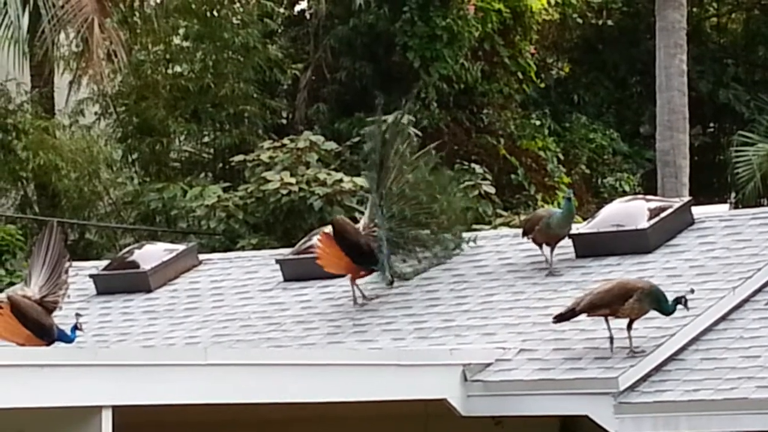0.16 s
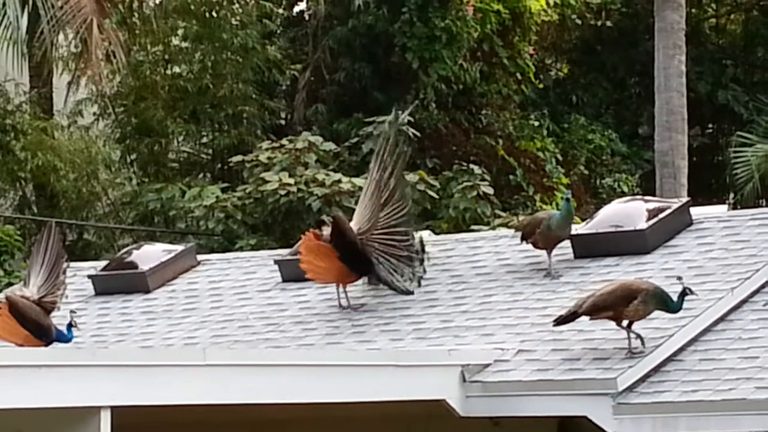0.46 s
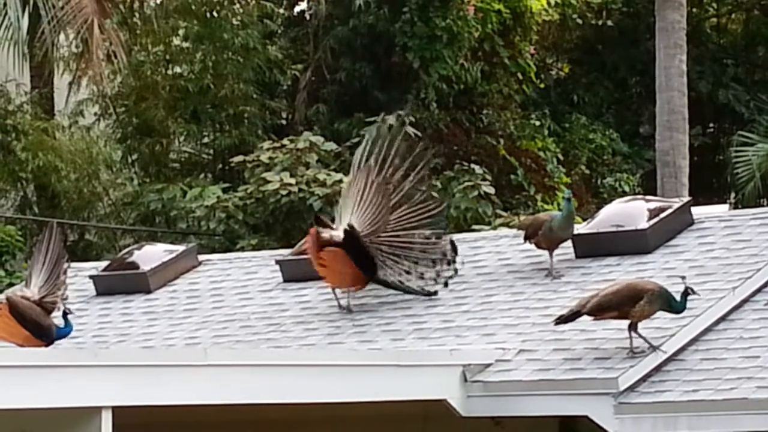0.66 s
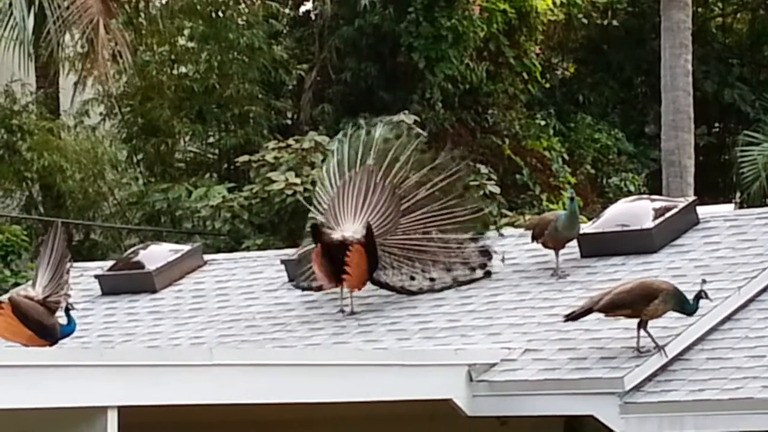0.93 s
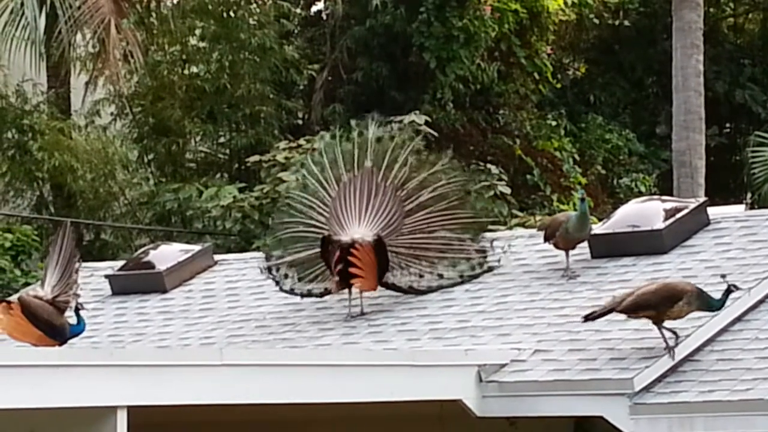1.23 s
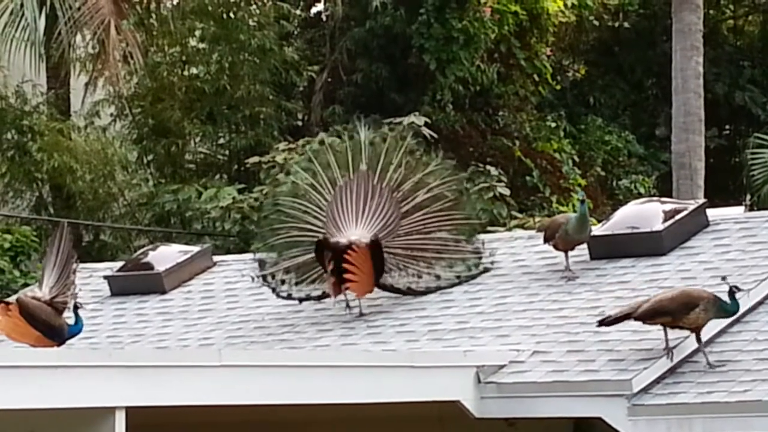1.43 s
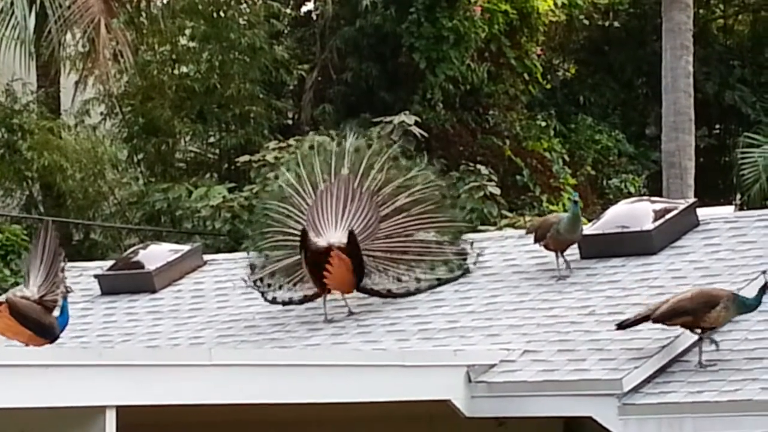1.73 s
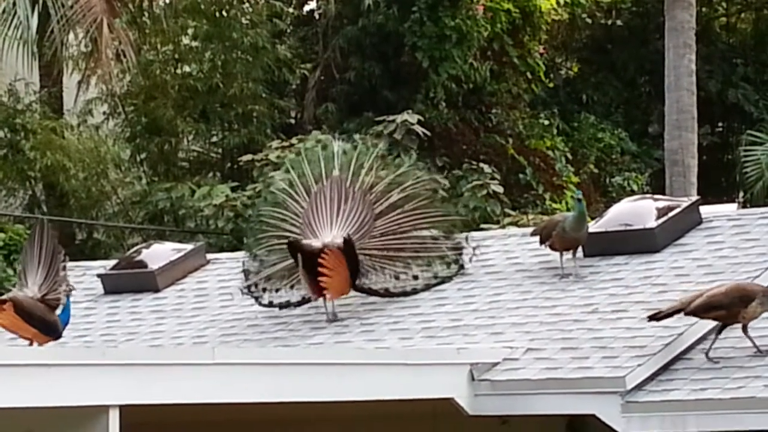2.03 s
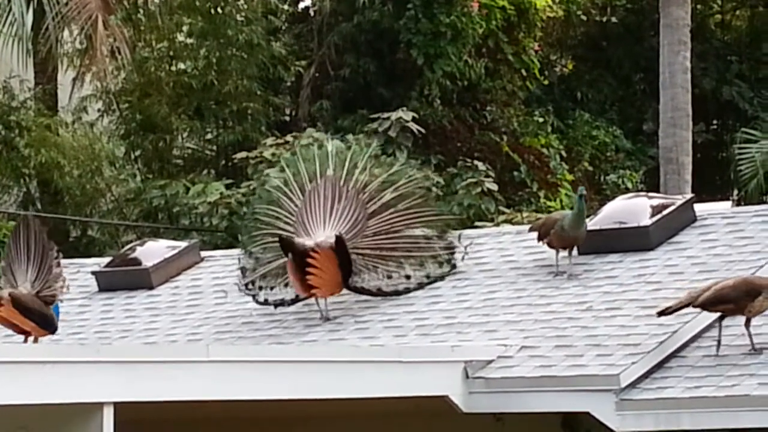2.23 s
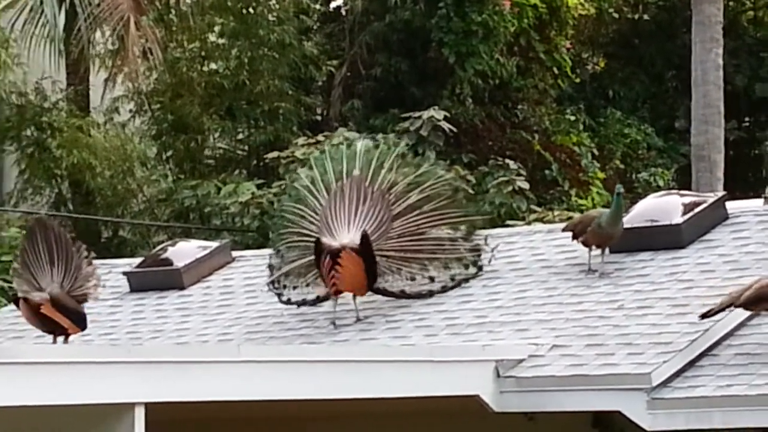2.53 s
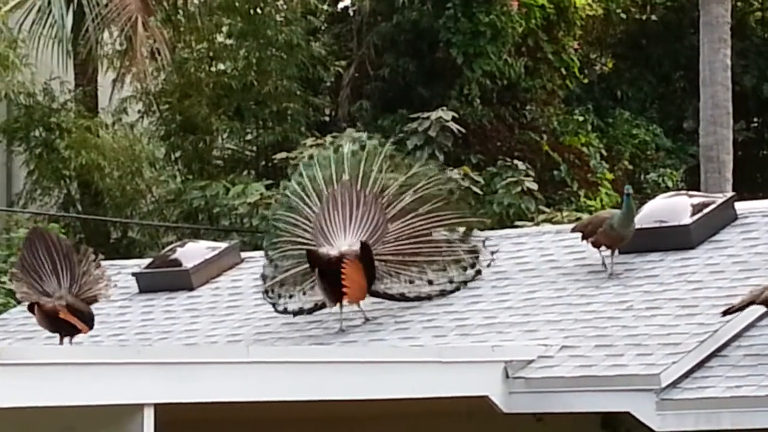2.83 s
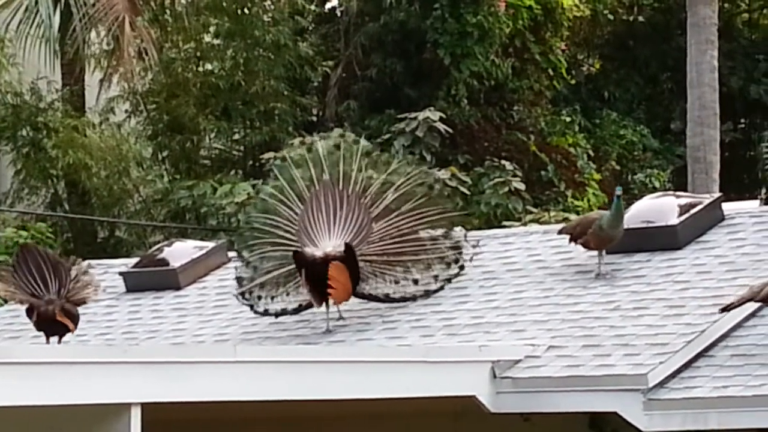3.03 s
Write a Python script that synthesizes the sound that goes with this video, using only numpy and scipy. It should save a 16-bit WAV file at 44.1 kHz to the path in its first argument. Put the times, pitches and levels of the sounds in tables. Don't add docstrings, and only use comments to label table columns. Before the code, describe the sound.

A peacock's fanned tail feathers rattle and rustle in dry, crisp bursts on a roof outdoors.

```python
import sys
import numpy as np
from scipy import signal
from scipy.fft import rfft, irfft, next_fast_len
from scipy.io import wavfile
from scipy.ndimage import uniform_filter1d, map_coordinates

SR = 44100
rng = np.random.default_rng(int(sys.argv[2]) if len(sys.argv) > 2 else 0)


def field_ratio(decibels):
    return 10 ** (np.asarray(decibels, dtype=float) / 20)


def file_out(sig):
    cols = np.atleast_2d(sig).T
    lim = np.clip(cols, -1, 1)
    pcm = np.round(lim * 32767).astype(np.int16)
    wavfile.write(sys.argv[1], SR, pcm)


N = 140238
T = np.arange(N) / SR

# frequency in Hz, level in dB.
RUMBLE = [(15, -38), (25, -2.5), (339, -2.5), (415, -6.5), (507, -8), (746, -12), (781, -12.5), (1000, -18),
          (1300, -24), (2200, -120)]
# frequency in Hz, width in Hz, level in dB.
HUM = [
    (119.2, 16, 1),
    (275, 26, -3),
    (315, 70, -10),
    (481.7, 20, -9),
]
# frequency in Hz, level in dB.
AIR = [(500, -11), (1000, 0), (2500, -7.5), (5000, -4.5), (14000, -11)]
# frequency in Hz, left-right likeness from 0 to 1.
ALIKE = [(40, 0.87), (300, 0.94), (700, 0.71), (1300, 0.017)]
# start in seconds, peak level in dB, left-right balance in dB,
# low body over the crack in dB, decay t60 in seconds.
SINGLE_SNAPS = [(.2815, -32, -12, -32, .012), (.488, -36, -11, -28, 0.011), (.799, -40, -10, -28, .012),
                (.831, -43, -6, -28, .02), (1.0445, -44, -6, -25, .03), (1.21, -41.5, -6, -13, .03),
                (1.4915, -41, -4, -25, .02), (1.684, -37, -8, -28, .02), (2.198, -48, -8, -27, .02),
                (2.473, -43, -5, -25, .02), (2.492, -44, -8, -25, .02), (.2965, -18.5, -16.5, -39, 0.014),
                (.315, -25.5, -23, -36, 0.012), (.3743, -23.5, -21, -25.5, 0.011),
                (.4275, -35.5, -15, -26, 0.018), (.493, -23, -6, -24, 0.013),
                (.5292, -22, -10, -24.5, 0.023), (.563, -45, 0, -17, .016), (.5893, -25.5, -7, -22, 0.017),
                (.737, -27.5, -7.5, -26, 0.027), (.7682, -27, -11, -28, 0.026),
                (.811, -26, -14, -23.5, 0.019), (1.0625, -37.5, 11, -19, 0.038),
                (1.508, -20.5, -9.5, -24.5, 0.047), (1.5603, -24, -4, -24, 0.019),
                (1.566, -27.5, -10, -14.5, 0.023), (1.793, -38, -9, -32, 0.036),
                (1.853, -42, -8.5, -24, 0.066), (1.9095, -30.5, -23, -26, 0.023),
                (2.155, -40.5, -7, -22, 0.056), (2.3305, -33.5, -2.5, -26, 0.041),
                (2.654, -30, -9.5, -21, 0.025), (2.855, -35, -19.5, -20, 0.021),
                (2.8925, -34, -7, -34, 0.03)]
# start in seconds, peak level in dB, left-right balance in dB,
# low body over the crack in dB, decay t60 in seconds.
SNAP_CLUSTERS = [(.175, -34.5, -7, -22, 0.016), (.277, -40.5, -12, -30, 0.038), (.303, -33, -4, -27, 0.011),
                 (.323, -33.5, -12, -38, 0.018), (.369, -30.5, -4.5, -33, 0.015),
                 (.4822, -28.5, -9, -29.5, 0.017), (.66, -37.5, -18, -28, 0.021),
                 (.6692, -29, -13, -25, 0.01), (.7025, -42.5, -3, -6.5, 0.029),
                 (1.226, -38, -12, -22, 0.033), (1.2305, -32, -14, -34, 0.032),
                 (1.237, -29, -4, -26, 0.025), (1.509, -31, -7, -23, 0.024), (1.5428, -28, 3, -21, 0.025),
                 (1.659, -38, -8, -28, .03), (1.336, -37, -13, -30, 0.032), (1.709, -34.5, -8, -17, 0.019),
                 (2.003, -33, -12.5, -20.5, 0.034), (2.2115, -31.5, -2, -23, 0.014),
                 (2.348, -50, -10, -20, 0.017), (2.786, -39.5, -13, -6.5, 0.034)]
# frequency in Hz, level in dB.
CRACK_TONE = [(800, -44), (2000, -20.5), (3600, -13), (5000, -1.5), (7500, -3), (10000, -7.5), (15000, -12)]
# frequency in Hz, level in dB.
KNOCK_TONE = [(150, -38), (500, 2.5), (1100, -1.5), (2200, -3), (3500, -11), (6000, -45)]
# crest in seconds, level in dB, rise in seconds, fall in seconds.
SHIVERS = [(.19, -52, 0.011, 0.11), (.29, -47, 0.0075, 0.049), (.33, -48.5, 0.019, 0.056),
           (0.432, -50.5, 0.013, 0.081), (.5, -51, 0.03, 0.046), (.57, -46, 0.012, 0.04),
           (0.669, -48, 0.026, 0.019), (0.706, -46, 0.004, 0.023), (0.791, -41, 0.016, 0.053),
           (0.919, -55, 0.0039, 0.073), (1.069, -50, 0.015, 0.082), (1.245, -39, 0.022, 0.014),
           (1.334, -51.5, 0.055, 0.089), (1.494, -56.5, 0.027, 0.06), (1.52, -49, 0.016, 0.033),
           (1.59, -54, 0.013, 0.05), (1.69, -47, 0.046, 0.032), (1.8, -51, 0.0065, 0.02),
           (1.901, -50, 0.021, 0.091), (2.013, -56, 0.014, 0.041), (2.202, -48, 0.019, 0.027),
           (2.339, -48.5, 0.014, 0.039), (2.503, -40.5, 0.019, 0.021), (2.721, -48, 0.069, 0.055),
           (2.801, -47, 0.023, 0.067), (2.902, -48, 0.038, 0.049), (3.029, -52, 0.023, 0.15)]
# frequency in Hz, level in dB.
BARB_TONE = [(1000, -21.5), (2500, -15), (3800, -6.5), (5000, -4), (7500, -3.5), (9500, -2.5), (12500, -7),
             (15000, -9)]
# frequency in Hz, t60 in seconds.
YARD_DECAY = [(300, 0.15), (2000, 0.3), (6000, 0.34), (14000, 0.24)]
# start in seconds, level in dB, pitch in Hz, left-right balance in dB.
STEPS = [(.738, -33.5, 544, 2), (1.176, -38.5, 203, 2), (.468, -36.5, 450, 3), (1.496, -36, 250, 4),
         (1.532, -39, 320, 0), (1.58, -40, 250, 4), (1.764, -42, 240, 2), (2.207, -39, 131, 4),
         (2.427, -39.5, 260, 6), (2.444, -46, 300, 6), (2.458, -40, 260, 6), (2.468, -46, 300, 8),
         (2.771, -39, 250, 2), (2.784, -33, 430, 1), (2.793, -36, 270, -2), (2.799, -38, 400, 2),
         (2.813, -41, 270, 2)]
# frequency in Hz, level in dB, t60 in seconds.
PLANK = [
    (1010, -42, .055),
    (816, -55, 0.044),
    (640, -53, .06),
    (1600, -60, .05),
]
# centre in seconds, level in dB, half length in seconds, left-right balance in dB.
PUFFS = [
    (2.45, -51, .025, 6),
    (2.792, -50, .016, 0),
]
# frequency in Hz, level in dB.
PUFF_TONE = [(60, -26), (200, 3.5), (450, -4.5), (900, -12), (2000, -43)]
# resonance in Hz, width in Hz, level in dB.
LEFT_PORT = [(1850, 2530, 5.5), (4920, 1220, 11.5), (8800, 740, -18)]
# resonance in Hz, width in Hz, level in dB.
RIGHT_PORT = [(3080, 2960, -1), (7020, 1880, 14), (11840, 3150, -1)]

KNOCK_GRAIN_DB = 2
HISS_CORNER_HZ = 8000


def unit(x):
    return x / np.sqrt(np.mean(x ** 2) + 1e-20)


def along(points, hz):
    f, v = np.transpose(points)
    return np.interp(np.log(hz + 1), np.log(f + 1), v)


def wobble(rate):
    knots = rng.standard_normal(int(N * rate / SR) + 4)
    return map_coordinates(knots, [T * rate])


def filtered(x, response):
    m = next_fast_len(N + SR // 2)
    return irfft(rfft(x, m) * response(np.fft.rfftfreq(m, 1 / SR)), m)[..., :N]


def peak(f, hz, width):
    return 1j * f * width / (hz * hz - f * f + 1j * f * width)


def rush(gain):
    def turn(f):
        return np.arccos(along(ALIKE, f)) / 2

    noise = rng.standard_normal((2, N))
    mid, side = filtered(noise, lambda f: gain(f) * [np.cos(turn(f)), np.sin(turn(f))])
    return unit(np.array([mid + side, mid - side]))


def town():
    def rumble_gain(f):
        low_cut = f ** 4 / (f ** 4 + 42 ** 4)
        return field_ratio(along(RUMBLE, f)) * low_cut

    def hum_gain(f):
        return sum(field_ratio(db) * abs(peak(f, hz, width)) ** 2 for hz, width, db in HUM)

    def air_gain(f):
        return field_ratio(along([(200, -40)] + AIR, f))

    rumble = field_ratio(-59.5 + 0.26 * wobble(4.15) + 0.86 * wobble(14)) * rush(rumble_gain)
    hum = field_ratio(-60.5 + 0.91 * wobble(9)) * rush(hum_gain)
    air = field_ratio(-63.5 + 0.53 * wobble(3.8)) * rush(air_gain)
    return rumble + hum, air


def gate(loud):
    window_s, slope, middle_db, range_db = 0.027, 0.44, -54.5, 3.5
    power = uniform_filter1d((loud ** 2).mean(0), round(window_s * SR))
    level_db = 10 * np.log10(np.abs(power) + 1e-9)
    return field_ratio(range_db * np.tanh(slope * (level_db - middle_db) / range_db))


def lagged(pair, spectrum):
    lag_s = 0.000592
    return filtered(pair, lambda f: field_ratio(along(spectrum, f)) * np.array(
        [np.exp(-2j * np.pi * f * lag_s), np.ones(len(f))]))


def clicks(spread_db, spectrum, rate):
    shared, patch_db = 0.14, 3
    raw = rng.standard_normal((3, N)) * field_ratio(spread_db * wobble(rate))
    pair = np.sqrt(shared) * raw[0] + np.sqrt(1 - shared) * raw[1:]
    z = signal.stft(pair, nperseg=128)[2]
    patches = uniform_filter1d(rng.standard_normal(z.shape[1:]), size=6, axis=0)
    patches = uniform_filter1d(patches, size=5, axis=1)
    patchy = signal.istft(z * field_ratio(patch_db * unit(patches)), nperseg=128)[1][:, :N]
    return unit(lagged(patchy, spectrum))


def snaps():
    crack, knock, release = np.zeros((2, N + SR)), np.zeros(N + SR), np.zeros((2, N))
    t = T[:SR // 8]
    kinds = ((SINGLE_SNAPS, .0002, .95, True), (SNAP_CLUSTERS, .0012, 2.2, False))
    for rows, attack, hold, single in kinds:
        for s, db, pan_db, body_db, t60 in rows:
            at = round(s * SR)
            side = field_ratio(np.array([.5, -.5]) * np.clip(pan_db + 10, -11, 11))
            fade = field_ratio(db - 60 * (t / t60) ** hold) * (1 - np.exp(-t / attack))
            crack[:, at:at + len(t)] += side[:, None] * fade
            knock_fade = field_ratio(db + body_db + 10.5 - 60 * t / (3.07 * t60))
            knock[at:at + len(t)] += knock_fade * (1 - np.exp(-t / .002))
            if single:
                release[:, at + round(.0003 * SR)] += side * field_ratio(db + 19)
    cracks = crack[:, :N] * clicks(1.5, CRACK_TONE, 900) + lagged(release, CRACK_TONE)
    knocks = knock[:N] * clicks(KNOCK_GRAIN_DB, KNOCK_TONE, 400)
    return field_ratio(-12) * (cracks + knocks)


def shivers():
    swell = np.zeros(N)
    for s, db, rise, fall in SHIVERS:
        before, after = np.exp(-((T - s) / rise) ** 2), np.exp(-np.abs(T - s) / fall)
        swell += field_ratio(db) * np.where(T < s, before, after)
    rustle = clicks(2.5, BARB_TONE, 750) * field_ratio(1.4 * wobble(90))
    rustle = rustle + field_ratio(-10.5) * clicks(KNOCK_GRAIN_DB, KNOCK_TONE, 300)
    return field_ratio(-7) * swell * rustle


def yard(x):
    gap_s = .004
    out = np.zeros((2, N))
    first = np.sin(2 * np.pi * 2.3 * T) > 0
    for turn in (first, ~first):
        hz, t, z = signal.stft(rng.standard_normal((2, SR // 2)), SR, nperseg=256)
        decay = field_ratio(-60 * t / along(YARD_DECAY, hz)[:, None])
        tail = signal.istft(z * decay, SR, nperseg=256)[1]
        late = np.pad(x.mean(0) * turn, (round(gap_s * SR), 0))
        out += signal.fftconvolve(late[None], tail / np.linalg.norm(tail[0]), axes=1)[:, :N]
    return field_ratio(-6.5) * out


def steps():
    out = np.zeros((2, N))
    for s, db, hz, pan_db in STEPS:
        t = np.maximum(T - s, 0)
        level = field_ratio(db + np.array([[.5], [-.5]]) * pan_db)
        out += level * np.sin(2 * np.pi * hz * t) * np.exp(-t * hz * 3.7)
    t = np.maximum(T - 2.781, 0)
    for hz, db, t60 in PLANK:
        out += field_ratio(db - 60 * t / t60) * np.sin(2 * np.pi * hz * t) * (1 - np.exp(-t / 0.0035))
    return out


def puffs():
    swell = np.zeros((2, N))
    for s, db, half, pan_db in PUFFS:
        level = field_ratio(db + np.array([[.5], [-.5]]) * pan_db)
        swell += level * np.exp(-((T - s) / half) ** 2)
    return swell * clicks(KNOCK_GRAIN_DB, PUFF_TONE, 120)


def scene():
    bird = snaps() + shivers() + steps()
    near = bird + yard(bird)
    low, air = town()
    opened = gate(near)
    return near + opened * low + opened ** 0.99 * air + puffs()


def port(f, rows, roll_hz):
    modes = 0
    for hz, width, db in rows:
        mode = peak(f, hz, width)
        modes = modes + field_ratio(db) * mode * abs(mode)
    return (1 + modes) / (1 + 1j * f / roll_hz)


def top_band(x):
    edge_hz, fall_db_per_khz = 14600, 12
    short, long = round(.002 * SR), round(.03 * SR)
    low = filtered(x, lambda f: f < edge_hz)
    top = filtered(x, lambda f: (f >= edge_hz) * field_ratio(fall_db_per_khz * (edge_hz - f) / 1000))
    power = (filtered(x, lambda f: f > HISS_CORNER_HZ) ** 2).mean(0)
    before = np.roll(uniform_filter1d(power, long), long // 2 + long // 8)
    sudden = uniform_filter1d(power, short) > 9 * before
    opened = uniform_filter1d(1. * sudden, short)
    return low + (field_ratio(-45) + field_ratio(-6) * opened) * top


def roll_off(x):
    return signal.sosfilt(signal.butter(12, 16300, fs=SR, output="sos"), x)


def record(dry):
    x = filtered(dry, lambda f: np.array([port(f, LEFT_PORT, 7260), port(f, RIGHT_PORT, 10900)]))
    hiss = field_ratio(-65) * rush(lambda f: f ** 2 / (f ** 2 + HISS_CORNER_HZ ** 2))
    mix = top_band(x + gate(dry) ** 0.99 * hiss)
    return roll_off(mix)


dry = scene()
out = record(dry)
file_out(out)
```